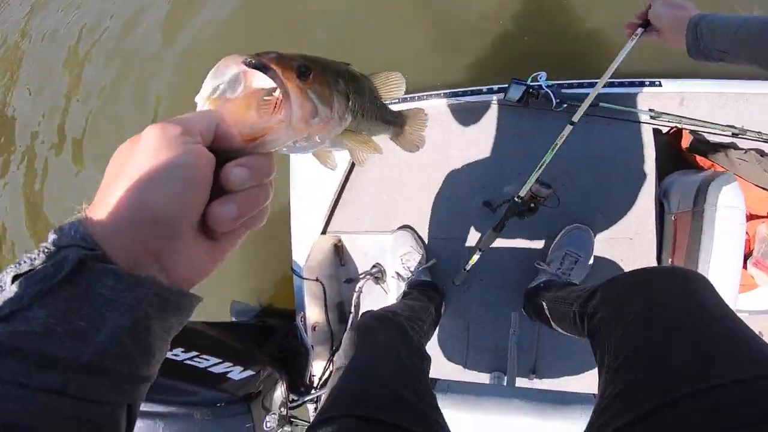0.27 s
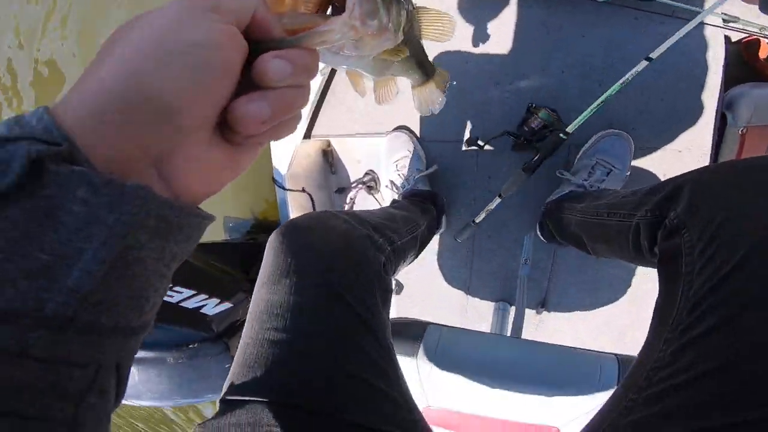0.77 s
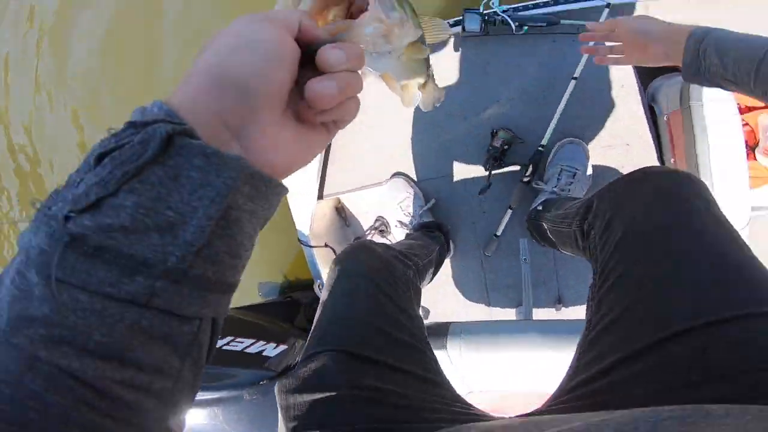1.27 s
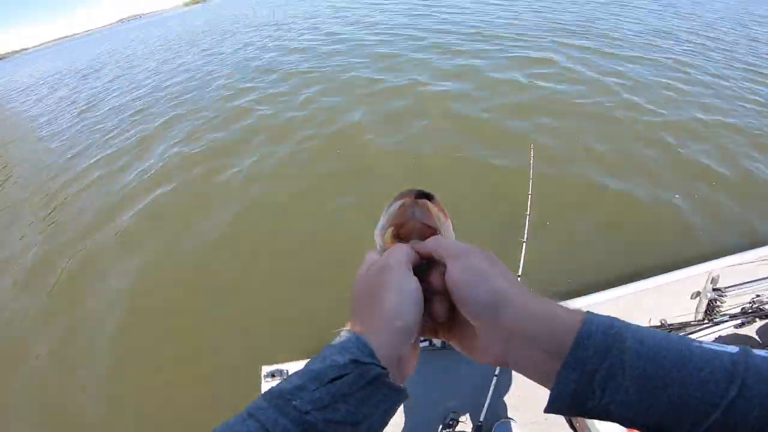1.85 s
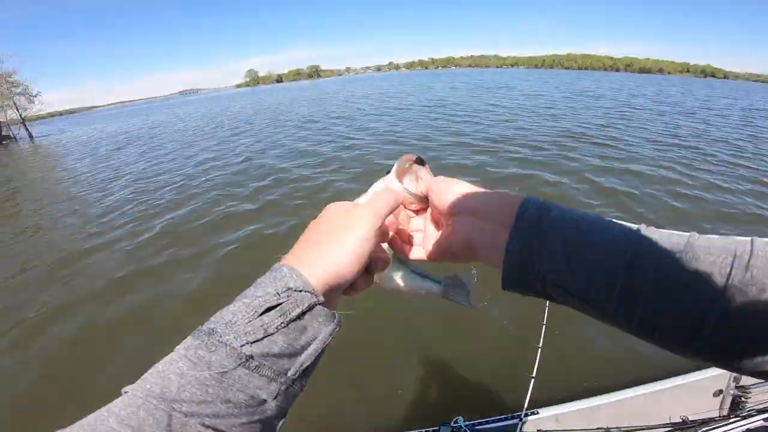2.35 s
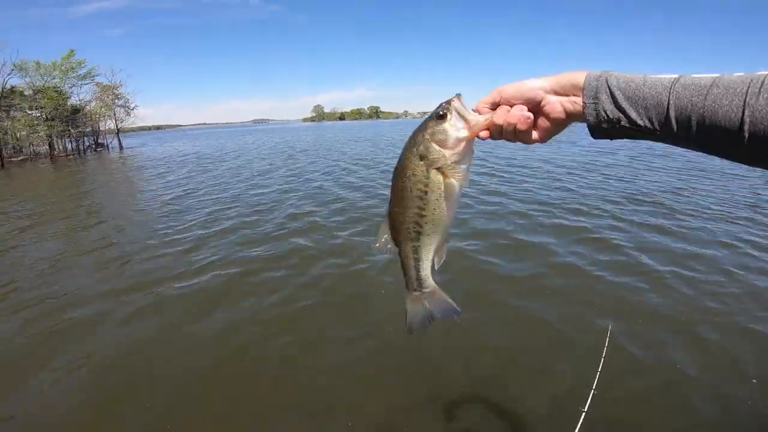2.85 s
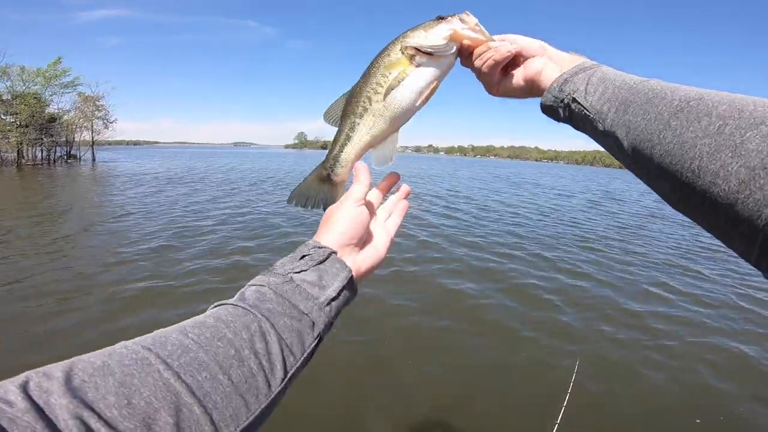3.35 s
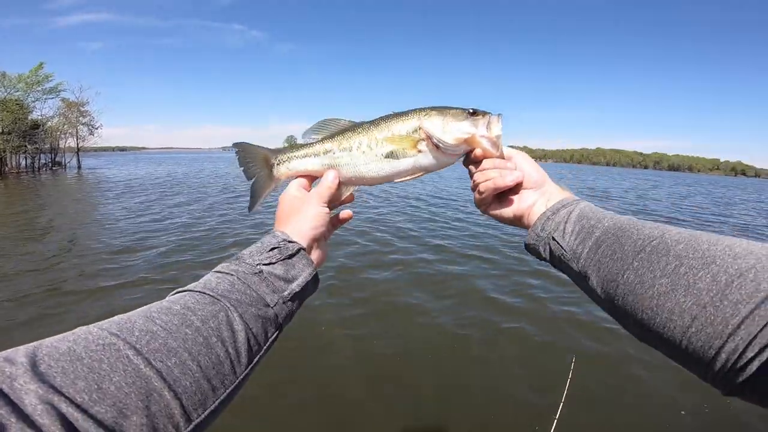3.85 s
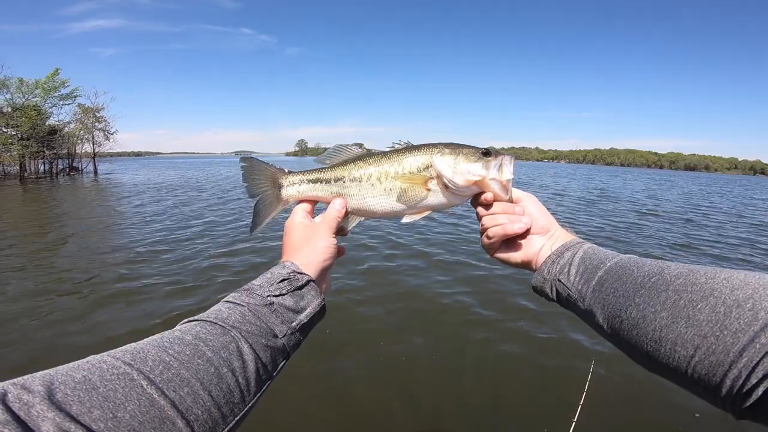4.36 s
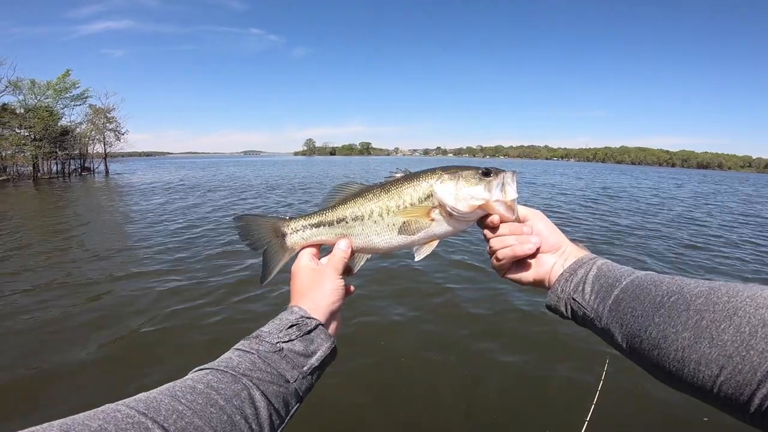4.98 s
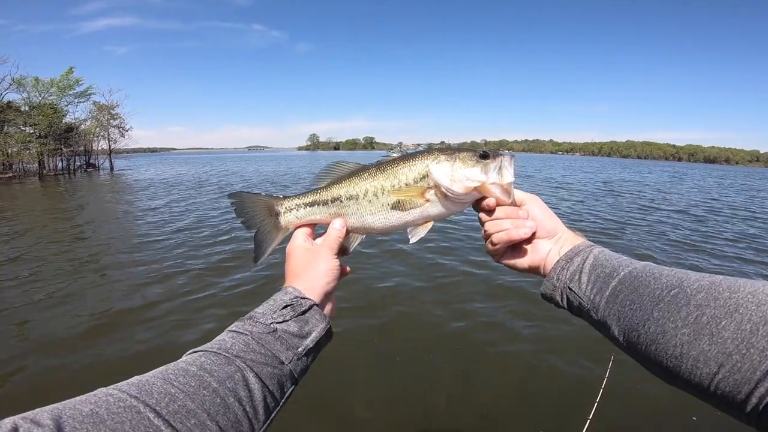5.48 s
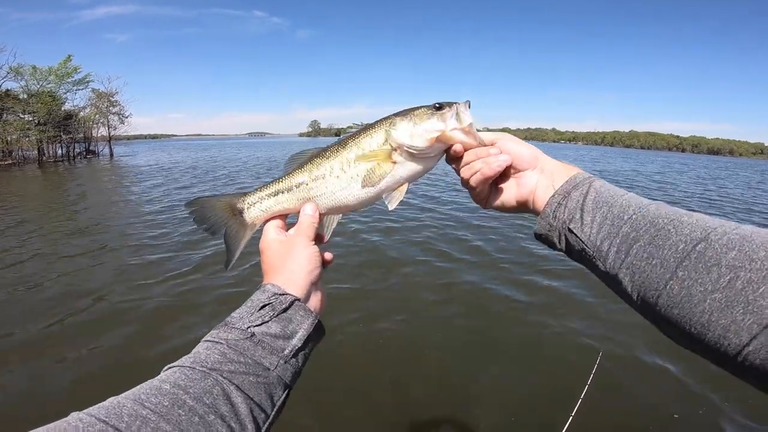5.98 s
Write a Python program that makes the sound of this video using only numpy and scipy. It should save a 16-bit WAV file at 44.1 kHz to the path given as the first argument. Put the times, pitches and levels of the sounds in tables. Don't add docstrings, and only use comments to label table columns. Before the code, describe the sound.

Close handling noise on a fishing boat: fluttering wind rumble, cloth rubbing, small knocks and a crisp reel latch clatter just after one second. Two deep thumps near two seconds, another before three, then quiet with a distant bird chirping. Late gusts swell with low bumps. The microphone is very close, wide in wind and narrowing to mono in the calm.

```python
import sys
import numpy as np
from scipy import signal
from scipy.fft import rfft, irfft, next_fast_len
from scipy.io import wavfile
from scipy.ndimage import uniform_filter1d, map_coordinates

SR = 44100
rng = np.random.default_rng(int(sys.argv[2]) if len(sys.argv) > 2 else 0)


def elevation(decibels):
    levels = np.asarray(decibels, float)
    return 10 ** (levels / 20)


def dump(signal):
    limited = np.clip(np.atleast_2d(signal).T, -1, 1)
    pcm = np.round(limited * 32767).astype(np.int16)
    wavfile.write(sys.argv[1], SR, pcm)


N = 274522


def unit(x):
    return x / np.sqrt(np.mean(x ** 2, axis=-1, keepdims=True) + 1e-20)


def along(points, hz):
    f, v = np.transpose(points)
    return np.interp(np.log(hz + 1), np.log(f + 1), v)


def curves(rows):
    s, *columns = np.transpose(rows)
    return [np.interp(np.arange(N) / SR, s, column) for column in columns]


def wobble(rate, channels=1):
    coarse = np.arange(0, N + 16, 16)
    out = np.zeros((channels, N))
    for i in range(channels):
        knots = rng.standard_normal(int(N * rate / SR) + 4)
        out[i] = np.interp(np.arange(N), coarse, map_coordinates(knots, [coarse * rate / SR]))
    return out


def coloured(x, points, turn=1):
    size = next_fast_len(N + 8192)
    gain = elevation(along(points, np.fft.rfftfreq(size, 1 / SR)))
    return irfft(rfft(x, size) * turn * gain, size)[..., :N]


def hiss(points, lumps_db=0., rate=30., patchy_db=-0.5):
    z = signal.stft(rng.standard_normal((2, N)), nperseg=512)[2]
    field = uniform_filter1d(rng.standard_normal(z.shape[1:]), size=7, axis=0)
    field = uniform_filter1d(field, size=16, axis=1)
    patchy = signal.istft(z * elevation(patchy_db * field / field.std()), nperseg=512)[1][:, :N]
    lumps = elevation(lumps_db * wobble(rate, channels=2))
    return unit(lumps * coloured(patchy, points))


def left_right(mid, side):
    return np.array([mid + side, mid - side])


def add(track, s, sound):
    i = round(s * SR)
    track[..., i:i + sound.shape[-1]] += sound[..., :N - i]


# (starts [s], fully open [s], starts to fold [s], folded [s])
OPENINGS = [
    (.26, .42, 2.735, 3.17),
    (4.87, 5.04, 7, 8),
]


def opening():
    folded_db = -54
    levels_db = np.tile([folded_db, 0, 0, folded_db], len(OPENINGS))
    return elevation(np.interp(np.arange(N) / SR, np.ravel(OPENINGS), levels_db))


# (frequency [Hz], density [dB per Hz])
LAKE = [(15, -44.5), (25, 7.5), (80, -26.5), (133, 11), (204, 0), (340, -15), (686, -14), (1080, -22),
        (1860, -30), (2180, -32.5), (3640, -48), (4760, -29.5), (6940, -49.5), (12900, -56), (15600, -66)]


def lake():
    return elevation(-55) * (1 - .4 * opening()) * hiss(LAKE, lumps_db=-1.0, rate=10)


# (time after its start [s], length [s], start pitch [Hz], end pitch [Hz], level [dB])
BIRD_PHRASE = [
    (-.052, .03, 2850, 3250, -67),
    (0, .035, 4200, 4850, -62),
    (.062, .028, 3750, 3300, -68),
    (.12, .035, 2950, 2650, -70),
    (.145, .045, 2750, 2550, -69),
    (.19, .13, 2600, 2550, -76),
]
# (time [s], level [dB])
BIRD_SONGS = [
    (2.885, -3.5),
    (3.287, -1),
    (3.686, -1.5),
]


def bird():
    out = np.zeros(N)
    for song_s, song_db in BIRD_SONGS:
        for after, length, start_hz, end_hz, db in BIRD_PHRASE:
            u = np.linspace(0, 1, round(length * SR))
            waver = 1 + 0.013 * unit(uniform_filter1d(rng.standard_normal(SR // 2), size=200))[:len(u)]
            phase = 2 * np.pi * np.cumsum(waver * (start_hz + (end_hz - start_hz) * u)) / SR
            add(out, song_s + after, elevation(db + song_db - 1.5) * np.sin(np.pi * u) * np.sin(phase))
    t = np.arange(SR // 3) / SR
    shore = rng.standard_normal(len(t)) * elevation(-60 * t / 0.41)
    return out + elevation(-2.0) * signal.fftconvolve(out, shore / np.linalg.norm(shore))[:N]


# (time [s], strength [dB])
BREEZE = [(0, -46.5), (.36, -45.5), (.59, -33.5), (.68, -42), (1.25, -43.5), (1.43, -35.5), (1.62, -42.5),
          (2.09, -35), (2.28, -42.5), (2.42, -53.5), (3.12, -52.5), (3.33, -59), (3.65, -56), (4.92, -50.5),
          (5.1, -46), (5.45, -54), (5.72, -36.5), (5.86, -50.5)]


def breeze():
    return curves(BREEZE)[0]


def hull():
    pitch_hz, boom_db, grows = 141, -59.5, .5
    drift, swell = wobble(14, channels=2)
    boom = np.sin(2 * np.pi * np.cumsum(pitch_hz * (1 + .05 * drift)) / SR)
    return elevation(boom_db + grows * (breeze() + 52) + 4.0 * swell) * boom


# (frequency [Hz], density [dB per Hz])
CLOTH_LOW = [(470, -31), (800, -1), (874, 2), (1070, -3.5), (1470, -2.5), (1760, -6.5), (2640, -12),
             (3600, -29.5), (4680, -45), (7920, -120)]
CLOTH_MID = [(1820, -39.5), (3100, -11), (3920, -6.5), (4330, -4.5), (4570, -4.5), (5150, -9.5),
             (6110, -7.5), (7050, -19), (8000, -20), (10400, -43.5), (17600, -120)]
CLOTH_HIGH = [(4120, -30.5), (7000, 8), (8560, 6), (9880, 2), (11200, -23), (12500, -0.5), (14500, -12.5),
              (15600, -26)]
# (time [s], effort [dB], nearness of the sleeve [dB])
ARM_MOVES = [(0, -57.5, -11), (.22, -68, 3.5), (.55, -60, -0.5), (.81, -68, -12), (1.04, -70.5, 8.5),
             (1.33, -64, -16), (1.44, -59.5, -1.5), (1.7, -55, 2.5), (1.97, -66.5, -4), (2.09, -58.5, -5.5),
             (2.22, -68, 1.5), (2.82, -67.5, -8.5), (3.52, -74, -7.5), (3.93, -67.5, -16), (4.11, -82, 0),
             (4.85, -70, -22.5), (5.2, -78, -24), (6.22, -76, -8.5)]


def cloth():
    effort_db, near_db = curves(ARM_MOVES)
    bands = [(CLOTH_LOW, effort_db),
             (CLOTH_MID, effort_db - 5.5 + 0.17 * near_db),
             (CLOTH_HIGH, effort_db - 10.5 + near_db)]
    out = np.zeros((2, N))
    for shape, db in bands:
        grains = elevation(3.2 * wobble(220))
        out += elevation(db) * unit(grains * hiss(shape, lumps_db=2.2, rate=17, patchy_db=3.0))
    return out


# (time [s], length [s], low edge [Hz], high edge [Hz], level [dB])
RUBS = [(.15, .13, 280, 560, -43.5), (1.252, .06, 2800, 6200, -51), (2.77, .36, 4300, 5000, -69),
        (2.93, .24, 1200, 1650, -62), (3.62, .4, 4200, 5900, -70), (3.66, .32, 1300, 1700, -70),
        (4.77, .13, 150, 520, -37.5), (4.76, .06, 600, 2200, -62), (4.95, .05, 1200, 1650, -59),
        (5.55, .14, 250, 560, -40), (6.16, .14, 3500, 7000, -65), (6.16, .16, 100, 330, -42),
        (.4, .2, 5800, 6800, -69), (1.99, .2, 3000, 9000, -68), (.42, .45, 4000, 4700, -70),
        (3.09, .16, 4300, 6600, -67.5), (1.62, .1, 8500, 14000, -61), (.04, .2, 4100, 4900, -65),
        (5.36, .5, 4200, 6000, -72), (2.58, .07, 300, 1900, -60), (6.07, .03, 600, 1100, -61),
        (2.712, .045, 1700, 2500, -58), (5.56, .09, 900, 4000, -70), (.1, .2, 5600, 6400, -68),
        (5.48, .36, 7000, 10000, -73), (5.5, .28, 11000, 13500, -81), (3.09, .075, 1250, 1550, -61),
        (4.845, .06, 1200, 1700, -64), (4.8, .025, 700, 2200, -64), (4.89, .11, 1700, 2300, -73),
        (.33, .045, 950, 1450, -54), (5.9, .06, 1400, 2100, -71), (2.56, .1, 350, 650, -52),
        (6.165, .1, 700, 1500, -66), (5.64, .18, 1500, 8000, -73), (4.6, .03, 1200, 1700, -68),
        (.44, .12, 380, 520, -52), (1.5, .22, 280, 600, -50)]


def rubs():
    out = np.zeros((2, N))
    for s, length, low_hz, high_hz, db in RUBS:
        u = np.linspace(0, 1, round(np.clip(length, .01, .5) * SR))
        edges_hz = [low_hz, max(high_hz, 1.05 * low_hz)]
        band = signal.butter(3, edges_hz, "bandpass", fs=SR, output="sos")
        size, *pair = rng.standard_normal((3, SR // 2))[:, :len(u)]
        grains = elevation(2.6 * unit(uniform_filter1d(size, size=100)))
        swell = np.sin(np.pi * u ** .7) ** 2
        add(out, s, elevation(db) * swell * unit(signal.sosfilt(band, grains * pair)))
    return out


# (frequency [Hz], side over mid [dB])
FAR_WIDTH = [(60, -9), (110, 5.5), (200, -22), (380, -10.5), (700, 9), (1290, 5.5), (2380, -5),
             (4400, -15.5), (8120, -0.5), (15000, -3.5)]


def lake_and_cloth():
    mid, other = cloth() + rubs() + lake()
    return left_right(mid, coloured(other, FAR_WIDTH))


# (time [s], pitch [Hz], level [dB])
FREE_PINGS = [(0.139, 4470, -45.5), (.183, 4500, -48.5), (0.312, 4930, -53), (.33, 7500, -55.5),
              (0.611, 5750, -48), (1.902, 2664, -53.5), (2.286, 6020, -51), (2.34, 5850, -58),
              (2.398, 5940, -48.5), (3.015, 5450, -56.5), (3.1, 1410, -53), (1.275, 3310, -18),
              (1.318, 3322, -21), (4.314, 1284, -54), (4.479, 1285, -51), (5.21, 1250, -64)]
# (time [s], pitch [Hz], level [dB])
HELD_PINGS = [(3.168, 470, -34), (3.167, 280, -37), (.36, 603, -37.5), (3.165, 1950, -36),
              (5.918, 1900, -58), (6.151, 1150, -38), (2.7, 400, -40), (3.151, 600, -42),
              (3.151, 4950, -52), (.347, 1320, -42), (.313, 4900, -46), (5.191, 1520, -49),
              (.988, 520, -37), (5.17, 520, -44), (5.309, 460, -47), (5.539, 570, -42), (5.591, 500, -33),
              (4.785, 1200, -50), (.549, 1700, -46), (1.9335, 800, -29), (6.155, 330, -27),
              (2.722, 300, -30), (2.61, 330, -40), (6.081, 850, -47), (5.965, 450, -42),
              (1.6624, 1500, -38)]
# (time [s], pitch [Hz], level [dB])
LATCH_PINGS = [(1.286, 7400, -12), (1.286, 6100, -15), (1.3285, 7300, -11), (1.3285, 6200, -14),
               (1.3405, 7300, -26), (1.353, 7300, -36), (1.299, 7400, -28), (1.275, 5400, -18),
               (3.165, 5100, -38), (3.165, 3200, -43), (3.157, 4900, -49), (.36, 7700, -36),
               (1.275, 7400, -20), (1.318, 7300, -21), (1.3405, 4900, -32), (1.288, 1750, -28),
               (4.87, 1450, -57), (4.965, 1450, -53)]


def pings():
    out, t = np.zeros(N), np.arange(SR // 8) / SR
    for parts, cycles in [(FREE_PINGS, 140), (HELD_PINGS, 20), (LATCH_PINGS, 75)]:
        for s, hz, db in parts:
            rattle = unit(uniform_filter1d(rng.standard_normal(len(t)), size=round(4 * SR / hz)))
            blur = 1 + (.25 + hz / 9000) * rattle
            decay = elevation(db - 60 * t * hz / cycles) * (1 - np.exp(-t / 0.0011))
            add(out, s, decay * blur * np.sin(2 * np.pi * hz * t))
    return out


# (time [s], peak [dB], low tone [dB], high tone [dB], t60 [s])
CLICKS = [(0.3461, -36.5, 0.5, -8, 0.032), (0.3595, -36, 9.5, 10, 0.014), (0.5498, -34.5, -10, 1, 0.016),
          (0.5814, -38, -1, 1.5, 0.035), (1.2743, -15.5, -10, -3, 0.034), (1.2855, -18.5, -6.5, 8.5, 0.024),
          (1.2971, -31, -2, 2.5, 0.055), (1.3171, -18, -9, 2, 0.024), (1.3269, -16, -14.5, -2.5, 0.016),
          (1.5145, -26.5, -9, -9.5, 0.04), (1.5274, -33, 0, 3, 0.03), (1.5553, -31, -5.5, -6, 0.032),
          (1.5607, -37, -2, 0.5, 0.052), (1.5714, -41, -1, -18, 0.053), (1.6386, -43.5, -14, 6, 0.058),
          (1.657, -37, 2.5, -18, 0.036), (1.6666, -37, -8, -1, 0.041), (1.6846, -44, -11, 4, 0.045),
          (3.1644, -45, 5.5, -27, 0.022), (1.5205, -32, 3, -8, .03), (1.5325, -36, 0, -2, .03),
          (1.541, -40, -3, 0, .03), (1.5665, -38, 0, -2, .025), (1.6445, -45, -8, 5, .025),
          (1.651, -46, -6, 3, .02), (1.6725, -42, -6, 0, .025), (.5765, -42, -3, 3, .02),
          (.588, -43, 3, 0, .025), (.367, -44, 4, 0, .02)]
# (time [s], peak [dB], brightness [dB])
TICKS = [(.2077, -54, 1), (0.679, -58, 6.5), (1.071, -51.5, 3), (1.1304, -56, 0.5), (1.622, -54, 9),
         (2.0287, -57, 7), (2.633, -56, 3), (2.7978, -56.5, -3), (4.3035, -53.5, -6), (4.3133, -52.5, -3.5),
         (4.4783, -51, -4), (1.697, -56, 4), (1.7472, -57, -3), (.598, -56, 3), (.27, -60, 6),
         (.478, -61, 3), (5.596, -62, 4), (5.31, -64, 2), (2.075, -60, 4), (2.118, -59, 2), (2.146, -57, 0),
         (2.17, -60, 4), (.118, -61, 7), (1.905, -57, -5)]
# (frequency [Hz], level [dB])
REEL_MODES = [(1280, -7.5), (1690, -4.5), (2490, -7.5), (3310, -5.5), (4290, -15), (4960, -5), (6200, -8.5),
              (6800, -17.5), (7900, -9.5)]
# (frequency [Hz], density [dB per Hz])
CRACK = [(530, -46), (900, -8.5), (1750, 0.5), (3030, -9.5), (3380, -2), (4040, -4), (7500, -4.5),
         (8650, -16), (12700, -42), (15500, -47)]
# (frequency [Hz], side over mid [dB])
DECK_WIDTH = [(60, 2.5), (110, 6.5), (200, -1.5), (380, -2.5), (700, -5), (1290, -2), (2380, -5),
              (4400, -14), (8120, 2), (15000, 1.5)]


def clicks():
    mid = pings()
    reel_hz, reel_db = np.transpose(REEL_MODES)[:, :, None]
    dense_hz = np.geomspace(900, 15500, num=80)[:, None]
    dense_db = along(CRACK, dense_hz) + 10 * np.log10(dense_hz / 4000) - 1.6
    hz = np.r_[reel_hz, dense_hz]
    level = np.r_[reel_db + 1.2, dense_db]
    life = np.r_[1.3 + 0 * reel_hz, .8 * (dense_hz / 4000) ** -.4]
    contacts = [*CLICKS, *[(s, db, -bright_db, bright_db, 0.044) for s, db, bright_db in TICKS]]
    for s, db, low_db, high_db, t60 in contacts:
        strength, detune, phase, lag = rng.standard_normal((4, len(hz), 1))
        tone = along([(1700, low_db + 2.5), (3200, 0), (4600, 0.011), (6500, high_db - 0.5)], hz)
        t = np.arange(round(min(1.2 * t60, .055) * SR) + 99) / SR
        age = np.maximum(t - 0.00064 * abs(lag), 0)
        decay_db = 60 * age / (life * max(t60, .005))
        ring = elevation(level + tone + 2.7 * strength - decay_db) * (1 - np.exp(-age / 0.00038))
        modes = ring * np.sin(2 * np.pi * (hz * (1 + 0.012 * detune) * t + phase))
        add(mid, s, elevation(db - 12.0) * modes.sum(0))
    t = np.arange(SR // 5) / SR
    deck = rng.standard_normal((2, len(t))) * elevation(-60 * t / 0.079)
    deck = deck / np.linalg.norm(deck[0])
    tail, other = elevation(-13.5) * signal.fftconvolve(mid[None], deck, axes=1)[:, :N]
    direct_side = coloured(.5 * mid, DECK_WIDTH, turn=np.exp(1.5j))
    return left_right(mid + tail, direct_side + coloured(4.2 * other, DECK_WIDTH))


# (time [s], peak [dB], pitch [Hz], shell
# ring [dB])
THUMPS = [(0.576, -33, 94, -43), (0.5775, -12.5, 200, -33), (0.597, -21.5, 165, -25), (0.99, -23, 165, -32),
          (1.288, -31, 277, -16), (1.936, -8, 150, -29.5), (2.037, -28, 118, -36), (2.108, -7.5, 130, -24),
          (2.211, -22, 156, -29.5), (2.253, -33, 141.3, -35), (2.72, -15, 152.6, -24.5),
          (2.735, -15, 156, -32), (5.142, -29, 137.5, -37.5), (5.155, -24, 110, -45),
          (5.241, -32.5, 164.5, -33), (5.546, -32.5, 186, -24), (5.577, -31, 205, -25.5),
          (5.689, -29, 120, -37.5), (5.774, -24.5, 127.6, -44), (5.961, -29, 130.7, -47.5),
          (6.151, -12.5, 158, -39)]


def thumps():
    out, t = np.zeros((2, N)), np.arange(SR // 8) / SR
    left_share = 0.11
    for s, db, hz, shell_db in THUMPS:
        t60 = 0.041 * elevation(-0.46 * (db + 22))
        sag = t + .003 * (1 - np.exp(-t / 0.003))
        swell = (1 - np.exp(-t / 0.0031)) ** 2
        rock = swell * elevation(db + 17.5 - 60 * t / t60) * np.sin(2 * np.pi * hz * sag)
        knock = (1 - np.exp(-t / .002)) * elevation(db + 0.5 - 60 * t / 0.02) * np.sin(2 * np.pi * 370 * t)
        shell_modes = [(600, 10.0), (820, 4.0), (1000, -6.0)]  # (Hz, dB)
        shell = sum(elevation(mode_db) * np.sin(2 * np.pi * mode_hz * t) for mode_hz, mode_db in shell_modes)
        shell = shell * (1 - np.exp(-t / .0012)) ** 2 * elevation(db + shell_db + 13.0 - 60 * t / 0.03)
        push = rock + knock
        add(out, s, np.array([left_share * push - 0.49 * shell, push + shell]))
    return out


# (peak time [s], level [dB], rise [s], fall [s])
GUSTS = [(.07, -42.5, 0.057, 0.27), (.45, -39.5, 0.03, 0.054), (0.586, -29, 0.028, 0.044),
         (0.699, -35.5, 0.069, 0.06), (.93, -40, 0.13, 0.098), (1.42, -38, 0.058, 0.052),
         (1.75, -36, .025, .03), (3.23, -50, .05, .05), (1.56, -29.5, 0.036, 0.041),
         (1.8, -37, 0.028, 0.13), (2.08, -24.5, 0.16, 0.19), (2.359, -32.5, .14, .04),
         (2.619, -44.5, .04, 0.029), (2.75, -48, 0.046, 0.04), (3.06, -39.5, 0.034, 0.024),
         (4.43, -60, 0.026, 0.068), (5.13, -34.5, 0.11, 0.059), (5.28, -36.5, 0.082, 0.085),
         (5.46, -36, 0.058, .035), (5.7, -31, 0.13, .04), (5.79, -21, 0.065, 0.036),
         (6.01, -33, 0.076, 0.038), (6.22, -37, 0.062, 0.064)]


def gusts():
    t = np.arange(0, N / SR + .01, .002)
    power = np.zeros(len(t))
    for s, db, rise, fall in GUSTS:
        power += elevation(2 * db) * np.exp(-2 * ((t - s) / np.where(t < s, rise, fall)) ** 2)
    return np.interp(np.arange(N) / SR, t, np.sqrt(power))


# (frequency [Hz], density [dB per Hz])
RUMBLE = [(11, -42.5), (18, -14.5), (54, -4.5), (70, -2.5), (92, -6.5), (130, -4.5), (170, -24),
          (290, -120)]
FLUTTER = [(80, -33.5), (110, -2.5), (150, 10), (220, 4), (330, -6), (420, -56)]
RASP = [(220, -36.5), (300, 5), (500, -2.5), (800, -12), (1200, -53)]
# (time [s], left over right [dB])
FAVOUR = [(.4, -5), (.59, 0.5), (.95, -15.5), (1.52, -18), (1.87, -2.5), (2.77, -20), (2.93, 0.5),
          (5.33, -0.5), (5.44, -9), (5.8, 0), (6.14, -12.5), (6.22, -31)]


def wind():
    breeze_db, big = breeze(), gusts()
    rumble_db = 20 * np.log10(big + elevation(-60.5 + 1.3 * (breeze_db + 48)))
    flutter_db = 20 * np.log10(elevation(-13.5) * big + elevation(breeze_db - 1.0))
    rasp_db = -60.5 + .7 * (breeze_db + 48.5)
    pan, = curves(FAVOUR)
    sides = np.array([elevation(pan / 2), elevation(-pan / 2)]) * 2 / np.sqrt(elevation(pan) + elevation(-pan))
    depth_db = np.clip((rumble_db + 60.0) * 0.14, .5, 5)
    puffs = elevation(depth_db * wobble(22, channels=2) - 0.14 * depth_db ** 2)
    rumble = elevation(rumble_db + 1.77) * sides * hiss(RUMBLE, lumps_db=2.0, rate=9, patchy_db=0.2)
    flutter = elevation(flutter_db + 1.09) * sides * hiss(FLUTTER, lumps_db=2.04, rate=44, patchy_db=0.45)
    mid, side = elevation(rasp_db + 3.0) * hiss(RASP, lumps_db=-1.0, rate=50, patchy_db=1.5)
    return puffs * (rumble + flutter + left_right(mid, elevation(1.0) * side))


def scene():
    return lake_and_cloth() + bird() + hull() + clicks() + thumps() + wind()


def roll_off(x):
    return signal.sosfilt(signal.butter(12, 15720, fs=SR, output="sos"), x)


def record(dry):
    dry = coloured(dry, [(15300, 0), (15750, -70)])
    mid = (dry[0] + dry[1]) / 2
    side = (dry[0] - dry[1]) / 2
    return roll_off(left_right(mid, opening() * side))


dry = scene()
out = record(dry)
dump(out)
```